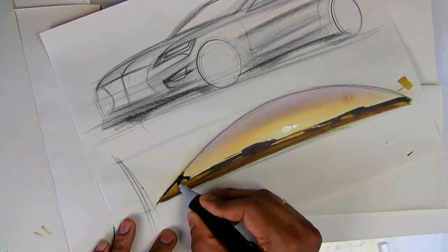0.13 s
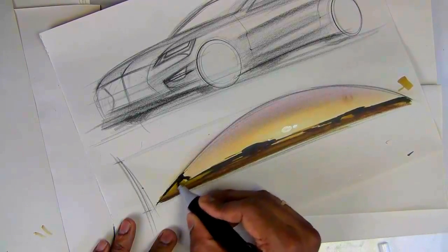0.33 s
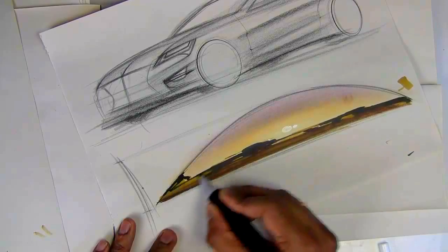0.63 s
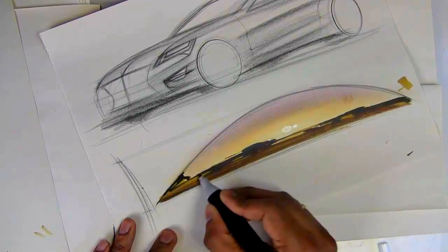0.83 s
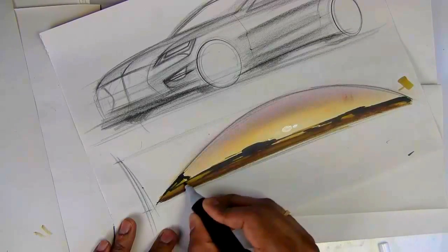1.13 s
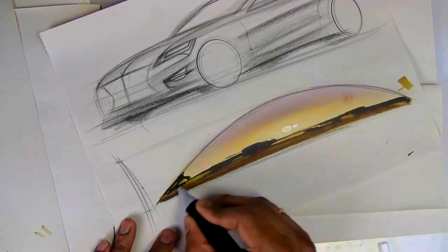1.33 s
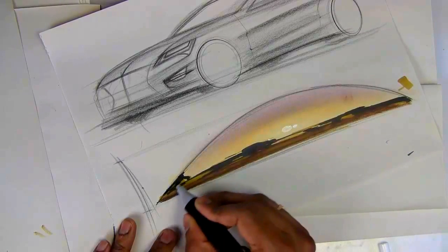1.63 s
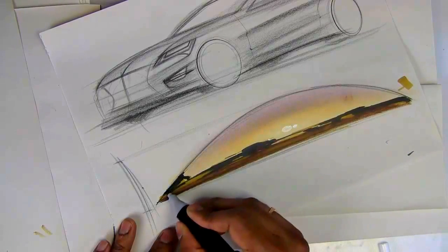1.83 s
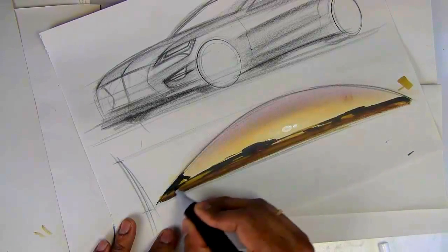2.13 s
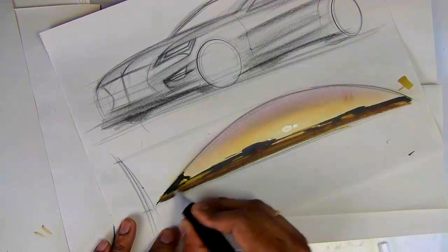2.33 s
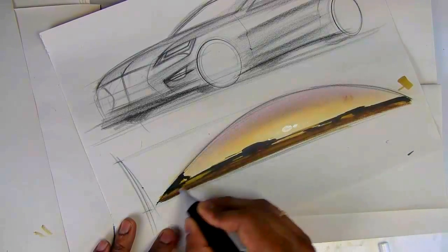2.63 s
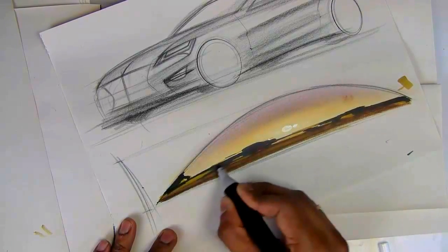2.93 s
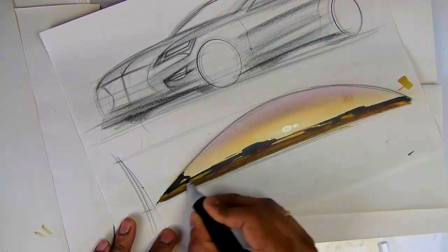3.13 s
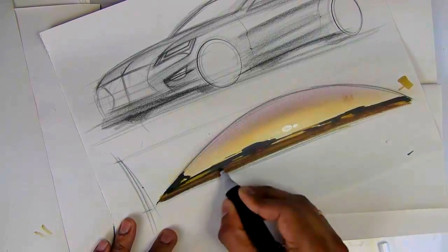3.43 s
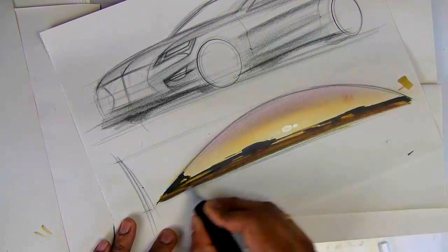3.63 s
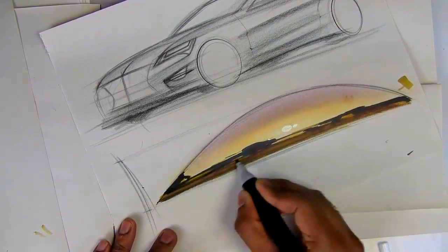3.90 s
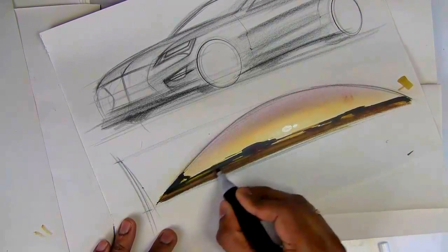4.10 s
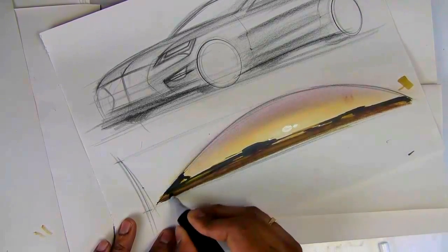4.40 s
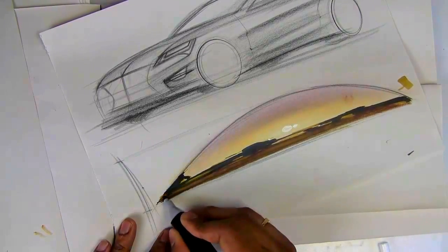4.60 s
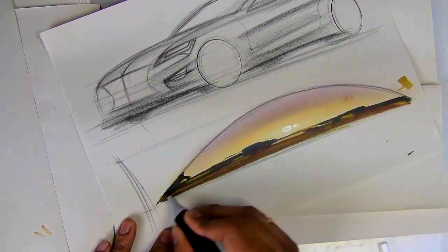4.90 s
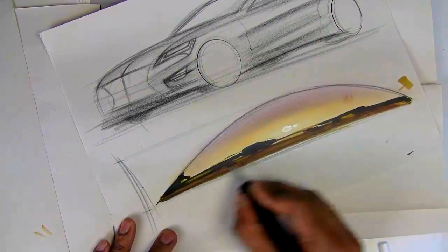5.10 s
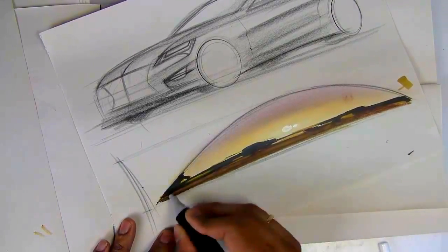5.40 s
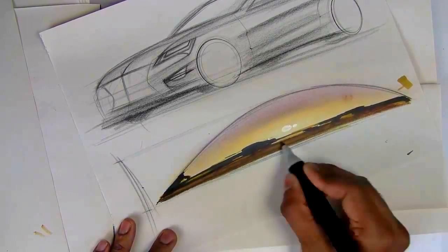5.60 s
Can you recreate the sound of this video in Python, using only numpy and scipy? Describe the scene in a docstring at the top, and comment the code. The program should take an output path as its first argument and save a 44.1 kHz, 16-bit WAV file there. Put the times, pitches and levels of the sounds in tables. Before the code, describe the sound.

Close to a stereo microphone in a quiet room, a marker rubs and scratches on a sheet of paper on a desk. A few strokes come first, then a rapid flurry, then firmer strokes about twice a second with light, thinly ringing slides in between. The felt tip occasionally catches in a brief squeak. Faint ventilation runs behind it all, with a low hum and a thin whine.

```python
"""In a quiet room, under a stereo microphone, a felt-tip marker fills a shape on paper in short strokes.
Friction is a broadband excitation: pressed strokes scratch and drive the resonances of tip, sheet, barrel
and desk. Between them the tip slides back lightly and a few narrow modes sing; now and then it squeaks
by stick-slip. Behind it ventilation rumbles, with a hum and one thin whine."""
import sys
import numpy as np
from scipy import signal
from scipy.fft import rfft, irfft, next_fast_len
from scipy.io import wavfile
from scipy.ndimage import uniform_filter1d, map_coordinates

SR = 44100
rng = np.random.default_rng(int(sys.argv[2]) if len(sys.argv) > 2 else 0)


def unload_wav(signal):
    """Save mono or channel-first audio to the path in sys.argv[1] as 16-bit WAV at rate SR, clipped to [-1, 1]."""
    wavfile.write(
        sys.argv[1],
        SR,
        np.round(np.clip(np.atleast_2d(signal).T, -1, 1) * 32767).astype(np.int16),
    )


N = 253575


def amp(db):
    """Amplitude ratio of a level in decibels."""
    return 10 ** (np.asarray(db) / 20)

def unit(x):
    """Normalisation to an RMS of 1."""
    return x / np.sqrt(np.mean(x ** 2) + 1e-20)

def along(points, hz):
    """Interpolation of (frequency, value) points on a log frequency axis."""
    point_hz, values = np.transpose(points)
    return np.interp(np.log(hz + 1), np.log(point_hz + 1), values)

def wobble(rate_hz):
    """Slow random modulation: a spline through rate_hz Gaussian knots a second."""
    knots = rng.standard_normal(int(N * rate_hz / SR) + 4)
    return map_coordinates(knots, [np.arange(N) * rate_hz / SR])

def filtered(x, response):
    """Linear filtering: the spectrum is multiplied by a frequency response."""
    size = next_fast_len(N + SR // 2)
    return irfft(rfft(x, size) * response(np.fft.rfftfreq(size, 1 / SR)), size)[..., :N]

def driven(force, response):
    """Forced vibration: the response to a force, at unit RMS."""
    return unit(filtered(force, response))

def mode(hz, centre_hz, width_hz):
    """Response of a damped oscillator, gain 1 at resonance."""
    return 1j * hz * width_hz / (centre_hz ** 2 - hz ** 2 + 1j * hz * width_hz)

def modes(table, hz):
    """Power summation of steep (squared) resonances, so that none cancels its neighbour."""
    return np.sqrt(sum((amp(db) * abs(mode(hz, centre, width)) ** 2) ** 2 for centre, width, db in table))

def panned(stereo, balance):
    """Level difference between channels: half is added to the left, half taken from the right."""
    return filtered(stereo, lambda hz: amp(np.outer([.5, -.5], along(balance, hz))))


# Background noise level over time, swelling at the start as the recorder's gain rises:
# time_s, level_db, treble_boost_db
BACKGROUND_LEVELS = [(0, -65.5, 1.5), (.5, -63, 5), (1.06, -60.5, 4), (1.97, -59, 2), (2.88, -57, 6),
                     (3.78, -59.5, 4.5), (4.58, -57.5, 2), (5.75, -60, 9.5)]
# Airflow spectrum: frequency_hz, density_db
VENT_SPECTRUM = [(12, -27), (20, -7.5), (123, -5), (233, 0), (467, -3), (751, -6.5), (888, -9), (993, -8.5),
                 (1390, -13), (1640, -16.5), (1780, -13.5), (12200, -25.5), (15700, -33)]
# Stereo width: frequency_hz, side_minus_mid_db
VENT_WIDTH = [(60, -3), (110, -3), (200, 3.5), (380, 6), (700, 4.5), (1290, 2), (2380, -5), (4400, -4),
              (8120, -2), (15000, 2)]
# Stereo balance: frequency_hz, left_minus_right_db
VENT_BALANCE = [(30, 0), (80, -4), (150, -0.5)]
# Hum and whine: pitch_hz, waver_hz, level_re_noise_db
VENT_TONES = [(116.5, 5.5, -9), (859, 14, -7.5)]

def ventilation():
    """Superposition of two wavering tones and flow noise, largely out of phase in the low mids."""
    time_s, *columns = np.transpose(BACKGROUND_LEVELS)
    level_db, treble_db = [np.interp(np.arange(N) / SR, time_s, column) for column in columns]
    noise = rng.standard_normal((2, N))
    mid = filtered(noise[0], lambda hz: amp(along(VENT_SPECTRUM, hz)))
    side = filtered(noise[1], lambda hz: amp(along(VENT_SPECTRUM, hz) + along(VENT_WIDTH, hz)))
    rush = np.array([mid + side, mid - side]) / np.std(mid)
    rush += (amp(treble_db) - 1) * filtered(rush, lambda hz: 1 / (1 + (2500 / (hz + 1)) ** 4))
    tones = np.zeros(N)
    for pitch_hz, waver_hz, tone_db in VENT_TONES:
        gain = amp(tone_db + 3.1 * wobble(14))
        tones += gain * np.sin(2 * np.pi * np.cumsum(pitch_hz + waver_hz * wobble(30)) / SR)
    return amp(level_db + 1.44 * wobble(5.02)) * panned(rush + tones, VENT_BALANCE)


def reflections(x, t60_s):
    """Diffuse decay: convolution with two uncorrelated noise tails that fall 60 dB in t60_s(hz)."""
    hz, t, spectra = signal.stft(rng.standard_normal((2, SR // 4)), SR, nperseg=128)
    tails = signal.istft(spectra * amp(-60 * t / t60_s(hz)[:, None]), SR, nperseg=128)[1]
    tails /= np.linalg.norm(tails, axis=1, keepdims=True)
    return signal.fftconvolve(x[None], tails, axes=1)[:, :N]

# Stereo width of the marker: frequency_hz, side_minus_mid_db
MARKER_WIDTH = [(300, -3), (1000, -15), (2500, -33), (4400, -10), (8000, -9), (15000, -3.5)]
# Its balance: frequency_hz, left_minus_right_db
MARKER_BALANCE = [(300, -2), (1000, 1.5), (2500, 0.5), (4400, 1), (8100, -2.5), (13000, 0.5)]
# Reverberation time of the room: frequency_hz, t60_s
ROOM_DECAY = [(500, 0.31), (4000, 0.25), (12000, 0.11)]

def desk_and_walls(x):
    """Scattering off the desk differs between channels as the hand moves; the walls reverberate."""
    paths = reflections(x, t60_s=lambda hz: np.full_like(hz, 0.025))
    angle = 2.33 * wobble(11)
    scattered = np.cos(angle) * paths[0] + np.sin(angle) * paths[1]
    side = filtered(scattered, lambda hz: amp(along(MARKER_WIDTH, hz)))
    near = panned(np.array([x + side, x - side]), MARKER_BALANCE)
    walls = reflections(x, t60_s=lambda hz: along(ROOM_DECAY, hz))
    return near + amp(-10.5) * walls


# Catches of the tip: start_s, length_s, from_hz, to_hz, level_db
TIP_SQUEAKS = [(.35, 0.076, 1392, 1450, -50.5), (.55, 0.093, 1450, 1420, -42.5),
               (2.314, 0.052, 1437, 1448, -41), (3.33, 0.054, 873, 817, -40),
               (5.086, 0.038, 824, 722, -39.5), (5.515, 0.028, 864, 819, -32.5),
               (5.539, 0.024, 743, 715, -34.5)]

def squeaks():
    """Stick-slip oscillation: the catching tip gives brief, rough tones, most gliding down."""
    sound, waver, flutter = np.zeros(N), wobble(150), wobble(90)
    for start_s, length_s, from_hz, to_hz, level_db in TIP_SQUEAKS:
        progress = np.linspace(0, 1, round(length_s * SR))
        at = slice(round(start_s * SR), round(start_s * SR) + len(progress))
        pitch_hz = (from_hz + (to_hz - from_hz) * progress) * (1 + 0.0493 * waver[at])
        envelope = amp(level_db + 4.16 * flutter[at]) * np.sin(np.pi * progress)
        sound[at] += envelope * np.sin(2 * np.pi * np.cumsum(pitch_hz) / SR)
    return sound


def friction(spiky_db, rough_db, shifting_db):
    """Friction noise: felt plucks paper fibres in uneven slips, clumped by the paper's tooth."""
    slips = rng.standard_normal(N) * amp(spiky_db * rng.standard_normal(N))
    slips *= amp(rough_db * (wobble(60) + wobble(400)))
    # The contact keeps changing, so the drive comes and goes in patches of time and frequency.
    spectra = signal.stft(slips, nperseg=512)[2]
    patches = uniform_filter1d(rng.standard_normal(spectra.shape), 4, axis=0)
    patches = uniform_filter1d(patches, 9, axis=1)
    return signal.istft(spectra * amp(shifting_db * unit(patches)), nperseg=512)[1][:N]

def hand_motion(rows):
    """Amplitude follows speed. Per sample: envelope, progress (-.5 to .5), columns from level_db on."""
    t = np.arange(N) / SR
    envelope, weighted = np.zeros(N), np.zeros((len(rows[0]) - 3, N))
    for start_s, rise_s, steady_s, fall_s, level_db, *columns in rows:
        stop_s = start_s + rise_s + steady_s + fall_s
        at = slice(max(round(start_s * SR), 0), round(stop_s * SR))
        up = np.clip((t[at] - start_s) / rise_s, 0, 1)
        down = np.clip((stop_s - t[at]) / fall_s, 0, 1)
        gain = amp(level_db) * (np.sin(np.pi / 2 * up) * np.sin(np.pi / 2 * down)) ** 2 + 1e-9
        envelope[at] += gain
        weighted[0, at] += gain * ((t[at] - start_s) / (stop_s - start_s) - .5)
        weighted[1:, at] += np.outer([level_db, *columns], gain)
    return envelope, *np.where(envelope > 0, weighted / np.maximum(envelope, 1e-12), 1)


# Light return slides: start_s, rise_s, steady_s, fall_s, level_db, sheet_re_tip_db, upper_re_tip_db
RETURN_SLIDES = [(0.11, 0.11, 0.026, 0.007, -69, -5, -9.0), (0.387, 0.005, 0.0, 0.14, -58.7, -21, -13),
                 (0.656, 0.005, 0.294, 0.122, -62, -9.5, -17),
                 (1.733, 0.006, 0.0029, 0.14, -59.5, -19, -10.0), (1.979, 0.005, 0.0, 0.091, -50, -14, -12),
                 (2.05, 0.038, 0.0069, 0.12, -54.5, -8.5, -12), (2.169, 0.062, 0.0, 0.033, -62, -4.0, -4.0),
                 (2.37, 0.17, 0.028, 0.245, -49.2, -9, -11.5),
                 (2.885, 0.005, 0.018, 0.29, -51.5, -6.5, -17), (3.38, 0.005, 0.025, 0.25, -50, -7.5, -17),
                 (3.871, 0.01, 0.015, 0.2, -53.6, -10.5, -19),
                 (4.047, 0.14, 0.01, 0.187, -50.5, -15.5, -16),
                 (4.494, 0.005, 0.0022, 0.052, -57.8, -9, -10.0), (4.76, 0.005, 0.012, 0.25, -53, -13, -15),
                 (5.128, 0.15, 0.042, 0.093, -47, -22.0, -15), (5.52, 0.217, 0.0, 0.042, -51, -16, -15)]
# Modes of the lightly loaded tip: centre_hz, width_hz, gain_db
LIGHT_TIP_MODES = [(5420, 580, -9.5), (6550, 520, 0), (10600, 480, -14.5)]
# Modes of the lightly rubbed sheet: centre_hz, width_hz, gain_db
LIGHT_SHEET_MODES = [(3060, 370, -2), (3600, 230, 3)]
# Hiss of light rubbing: frequency_hz, density_db
LIGHT_HISS = [(1500, -24.5), (2500, -27.5), (5000, -17.5), (9000, -14), (15700, -15.5)]

def slides():
    """Light damping gives sharp resonance: the barely pressed tip sings over a faint hiss."""
    envelope, _, _, sheet_db, upper_db = hand_motion(RETURN_SLIDES)
    force = friction(spiky_db=2.5, rough_db=0.6, shifting_db=2.0)
    tip = driven(force, lambda hz: np.hypot(modes(LIGHT_TIP_MODES, hz), amp(along(LIGHT_HISS, hz))))
    sheet = driven(force, lambda hz: modes(LIGHT_SHEET_MODES, hz))
    upper_mode = driven(force, lambda hz: abs(mode(hz, 8080, 350)) ** 2)
    return envelope * (tip + amp(sheet_db) * sheet + amp(upper_db) * upper_mode)


# Desk top under the hand: centre_hz, width_hz, gain_db
DESK_MODES = [(35, 114, -5), (319, 63, 2)]

def desk_rumble(force):
    """Structure-borne sound: friction drives the low modes of the desk."""
    return driven(force, lambda hz: modes(DESK_MODES, hz))


# Marker barrel: centre_hz, width_hz, gain_db
BARREL_MODES = [(776, 200, -3.5), (896, 48, -1.5), (1090, 416, 2), (1410, 150, 0.5)]

def barrel_ring(force, pitch_hz):
    """Selective damping: the grip leaves modes near pitch_hz free and smears part of the ring."""
    ring, power = 0, 0
    for centre_hz, width_hz, gain_db in BARREL_MODES:
        freedom = amp(gain_db) * np.exp(-(np.log(pitch_hz / centre_hz) / 0.29) ** 2) + 0.077
        response = lambda hz: mode(hz, centre_hz, width_hz) * mode(hz, centre_hz, 4 * width_hz)
        ring += freedom * driven(force, response)
        power += freedom ** 2
    smear = driven(force, lambda hz: abs(mode(hz, 1480, 1460)) ** 2)
    return 0.6 * ring / np.sqrt(power) + 0.31 * smear


# Paper under a pressed tip: centre_hz, width_hz, gain_db
SHEET_MODES = [(3080, 374, 1.5), (3497, 400, 1.5), (4130, 1200, -6)]

def sheet_rasp(force, hardness, barrel_hz):
    """Forced vibration of paper; hard rubbing with a loose, low-pitched grip brings out a lower mode."""
    rasp = driven(force, lambda hz: np.hypot(modes(SHEET_MODES, hz), 0.17 * abs(mode(hz, 3370, 4500))))
    low_mode = driven(force, lambda hz: abs(mode(hz, centre_hz=2364, width_hz=220)) ** 2)
    return rasp + 0.34 * hardness * (900 / barrel_hz) ** 3.6 * low_mode


# Hiss of pressed felt: frequency_hz, density_db
SCRATCH_SPECTRUM = [(2240, -37), (3800, -21.5), (5300, -4.5), (6410, 0.5), (7390, -6), (8170, -1),
                    (10900, -7.5), (13500, -8.5), (15700, -14)]
# Tip with its broad face down: centre_hz, width_hz, gain_db
FACE_MODES = [(4920, 250, 1.5), (6470, 770, 0), (8090, 540, 8.5), (9680, 530, 5.5), (12080, 340, 2),
              (13440, 400, 4.5)]
# Tip with its edge down: centre_hz, width_hz, gain_db
EDGE_MODES = [(5640, 620, 11.5), (7100, 290, 8.5), (8850, 790, 3.5)]

def tip_scratch(force, hardness, edge_share):
    """Contact damping: harder rubbing trades the ring of the tip for hiss, and sounds brighter."""
    spectrum = lambda hz: amp(along(SCRATCH_SPECTRUM, hz))
    hiss = driven(force, spectrum)
    face = driven(force, lambda hz: spectrum(hz) * modes(FACE_MODES, hz))
    edge = driven(force, lambda hz: spectrum(hz) * modes(EDGE_MODES, hz))
    ring = 1.34 * ((1 - edge_share) * face + edge_share * edge)
    hiss_share = 0.28 + .5 * np.minimum(hardness, 1.5) ** 0.19
    scratch = hiss_share * hiss + (1 - hiss_share) * ring
    treble = filtered(scratch, lambda hz: 1 / (1 + (10300 / (hz + 1)) ** 10))
    return scratch + 0.76 * (np.minimum(hardness, 1.2) ** 0.57 - .6) * treble


# Pressed strokes: start_s, rise_s, steady_s, fall_s, level_db,
# then at mid-stroke: sheet_gain_db, barrel_gain_db, barrel_pitch_hz, edge_share (0 to 1)
PRESSED_STROKES = [(-0.069, 0.006, 0.0, 0.14, -45, -11, -4, 1390, 0.0),
                   (0.176, 0.05, 0.0074, 0.019, -52, -17, -3.5, 1100, 0.0),
                   (0.282, 0.075, 0.0033, 0.072, -36.5, -11.5, -19.5, 1350.0, 0.07),
                   (0.537, 0.048, 0.0, 0.12, -30, -9.5, -16.5, 1440.0, 0.3),
                   (1.046, 0.069, 0.0, 0.026, -49.5, -15, -8.5, 930.0, 0.05),
                   (1.153, 0.031, 0.038, 0.05, -31.5, -13, -18, 1290.0, 0.24),
                   (1.258, 0.041, 0.033, 0.066, -34.5, -9.5, -13.5, 1200.0, 0.26),
                   (1.378, 0.075, 0.01, 0.044, -35.2, -13.0, -18.5, 1010, 0.5),
                   (1.497, 0.038, 0.042, 0.041, -34.5, -16.0, -19.0, 940.0, 0.44),
                   (1.601, 0.061, 0.0088, 0.079, -33.5, -12, -19.5, 1130.0, 0.3),
                   (1.787, 0.014, 0.0026, 0.037, -51.5, -13.0, -6, 1010, 0.05),
                   (1.92, 0.047, 0.0025, 0.033, -32.5, -20.5, -16.5, 1110.0, 0.2),
                   (2.303, 0.047, 0.0031, 0.12, -26.5, -10.5, -17.5, 1300, 0.27),
                   (2.675, 0.03, 0.0026, 0.026, -45.5, -17, -14, 880.0, 0.5),
                   (2.735, 0.069, 0.027, 0.078, -25.5, -12, -21, 1050, 0.13),
                   (3.034, 0.17, 0.0026, 0.062, -33, -11.5, -20.5, 960.0, 0.56),
                   (3.248, 0.09, 0.0022, 0.11, -24, -9.5, -18, 1080.0, 0.5),
                   (3.509, 0.13, 0.048, 0.052, -30, -9.5, -22.5, 950.0, 0.78),
                   (3.723, 0.09, 0.0047, 0.12, -24.5, -9.5, -18.5, 1170, 0.17),
                   (4.262, 0.011, 0.0017, 0.054, -48.6, -12, -14.5, 830.0, 0.5),
                   (4.375, 0.096, 0.0022, 0.049, -42.5, -16.5, -10.0, 1130.0, 0.8),
                   (4.627, 0.038, 0.02, 0.09, -30.5, -14, -19.5, 1080, 0.67),
                   (4.912, 0.029, 0.0056, 0.014, -41.5, -18, -15, 1100.0, 0.55),
                   (4.964, 0.079, 0.0079, 0.13, -26, -12.5, -23.5, 920, 0.35),
                   (5.405, 0.099, 0.0062, 0.098, -25, -9.5, -19.5, 890, 0.1)]

def strokes():
    """Source and filter: one friction force drives tip, sheet, barrel and desk together."""
    envelope, progress, level_db, sheet_db, barrel_db, barrel_hz, edge_share = hand_motion(PRESSED_STROKES)
    hardness = envelope / amp(-22.5)
    # The tip digs in through each stroke: the sheet grows, the barrel fades and sags, the tip rolls.
    sheet_db += 14.5 * progress
    barrel_db -= 9.5 * progress
    barrel_hz *= 1 - 0.14 * progress
    edge_share = np.clip(edge_share + 0.19 * progress, 0, 1)
    force = friction(spiky_db=2.5, rough_db=0.28, shifting_db=2.5)
    tip = tip_scratch(force, hardness, edge_share)
    sheet = amp(sheet_db) * sheet_rasp(force, hardness, barrel_hz)
    barrel = amp(barrel_db) * barrel_ring(force, barrel_hz)
    # The barrel follows pressure, so it starts sooner and swells less than the scratch.
    barrel *= (envelope / amp(level_db) + .01) ** -0.32
    return envelope * (tip + sheet + barrel + amp(-32.5) * desk_rumble(force))


def scene():
    """Superposition of the marker, its reflections and the ventilation."""
    return desk_and_walls(strokes() + slides() + squeaks()) + ventilation()

def record(dry):
    """Band limiting: an ideal low-pass filter removes the highest treble."""
    return filtered(dry, lambda hz: hz < 15660)


dry = scene()
out = record(dry)
unload_wav(out)
```